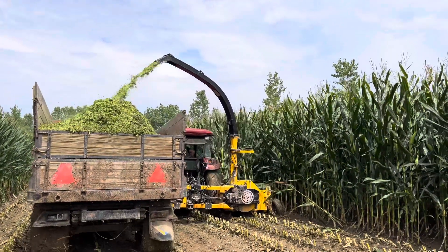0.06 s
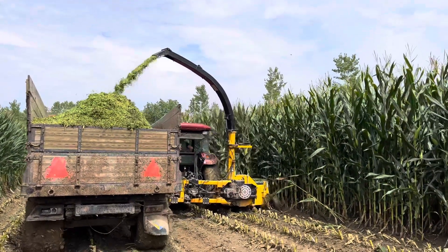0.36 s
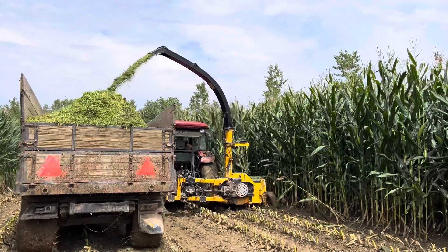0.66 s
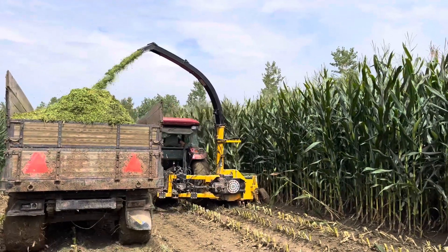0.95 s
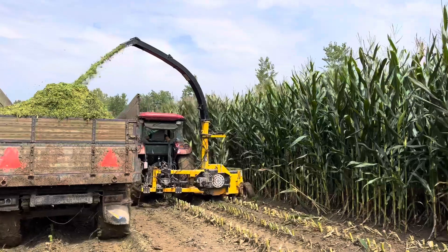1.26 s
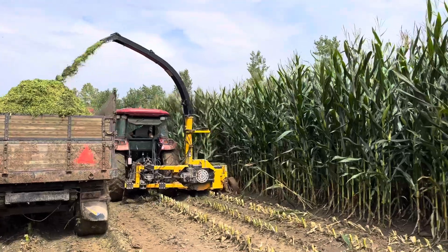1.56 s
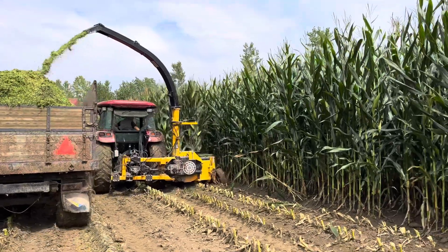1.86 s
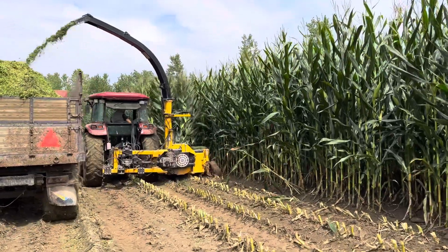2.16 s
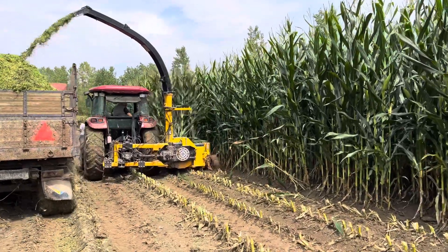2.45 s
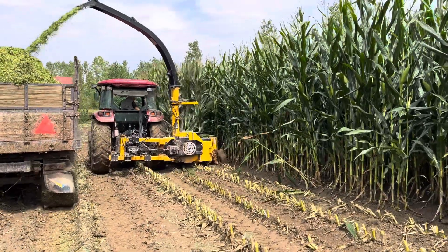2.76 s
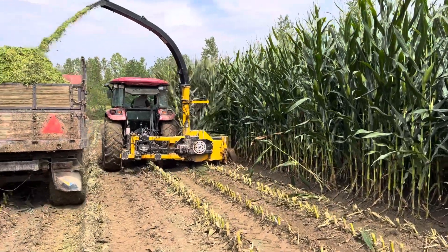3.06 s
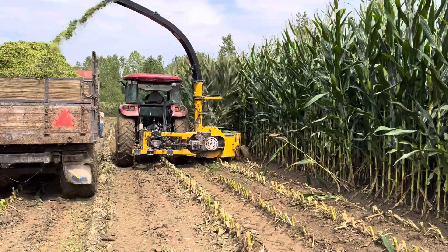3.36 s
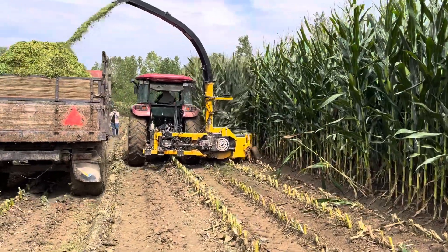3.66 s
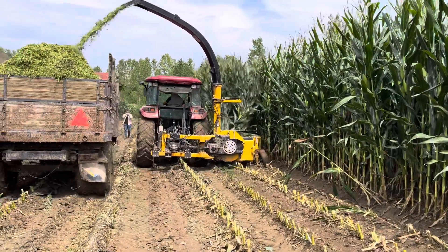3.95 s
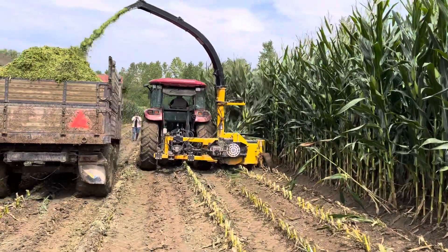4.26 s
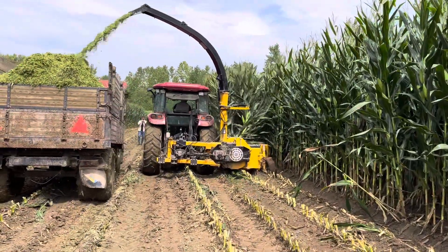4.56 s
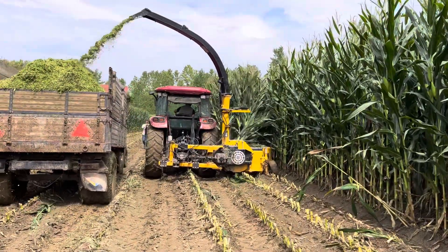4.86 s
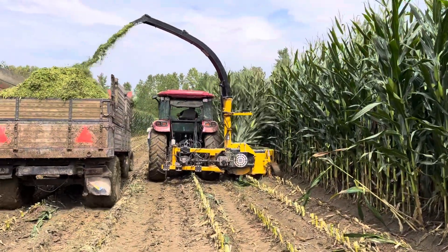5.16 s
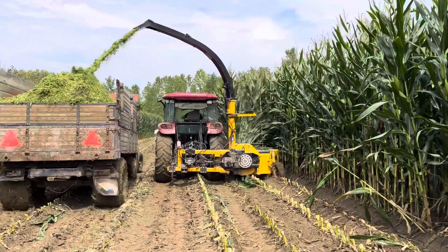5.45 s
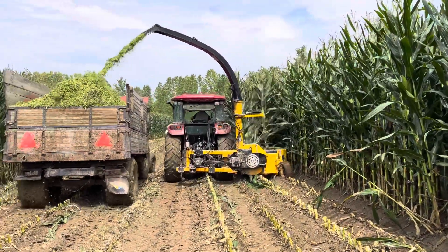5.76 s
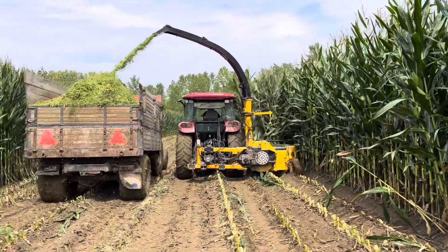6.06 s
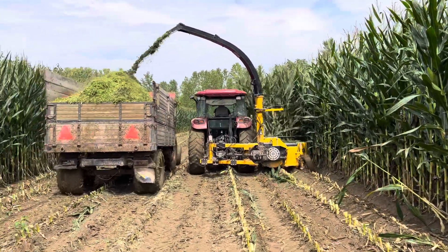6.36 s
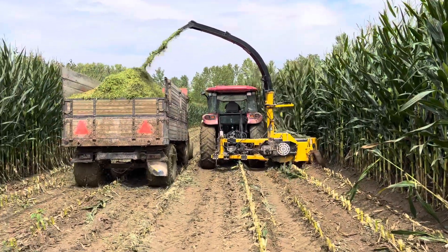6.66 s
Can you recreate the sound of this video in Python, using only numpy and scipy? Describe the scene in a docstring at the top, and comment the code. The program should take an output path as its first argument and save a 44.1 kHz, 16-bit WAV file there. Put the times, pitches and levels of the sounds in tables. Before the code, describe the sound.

A crop chopper hums loudly at nearly one pitch over a droning tractor, shredded stalks hissing up its spout as a truck rumbles nearby.

```python
"""An open field of tall maize, behind a tractor-driven forage harvester, on two closely spaced mic ports.
At first a small diesel truck screens the machine: the twelve-knife chopper hums and throbs with the feed,
the tractor drones below it, the housing roars and chopped stalks hiss up the steel spout.
From about two seconds the truck revs up and clears the line of sight, and a bright band of the roar climbs.
After five seconds the harvester pulls away and its roar eases; near the end the truck's revs drop."""
import sys
import numpy as np
from scipy import signal
from scipy.fft import rfft, irfft, next_fast_len
from scipy.io import wavfile
from scipy.ndimage import uniform_filter1d, map_coordinates

SR = 44100
rng = np.random.default_rng(int(sys.argv[2]) if len(sys.argv) > 2 else 0)


def put_to_file(sound):
    """Save the sound as 16-bit audio at rate SR, in the file named by the first command-line argument."""
    columns = np.atleast_2d(sound).T  # one column per channel
    safe = np.clip(columns, -1, 1)
    whole_steps = np.round(safe * 32767)
    wavfile.write(sys.argv[1], SR, whole_steps.astype(np.int16))


N = 300321

# How far the truck has cleared the mic's view. Each row: time in seconds, share from 0 to 1.
VIEW = [(0, 0), (1.5, 0.07), (2.4, 0.25), (3.3, 0.81), (6.81, 0.99)]
# The two mic ports. Each row: frequency in Hz, left over right in dB, left lead in radians, likeness 0-1.
MIC_PORTS = [(60, -2.5, -.47, 1), (160, -2.7, -.52, 1), (225, -4.2, -.5, 1), (310, -6.2, -.35, .995),
             (450, -8, .45, .9), (600, -11.5, 1.2, .8), (800, -3, 1.8, .94), (1050, 2.5, 1.5, .85),
             (1200, 2.5, .7, .9), (1350, 1.3, .3, .9), (1520, .7, .3, .8), (1720, 0, 0, .3),
             (2000, -.7, -.5, .75), (2700, -.5, 1.2, .3), (3300, -2.5, .45, .55), (4200, -3, .4, .65),
             (5300, -4.5, 2.7, .6), (6300, -1.5, 5.7, .6), (7000, 2, 4.2, .4), (7600, 0, 3.2, .98),
             (8600, 0, 3.05, .98), (9100, -1, 2.2, .5), (10000, -2, 1.3, .55), (10700, 0, .1, .96),
             (12400, 0, -.2, .96), (13400, 0, -1.1, .85), (14100, 0, -2.5, .8)]
# Wide stereo part of the roar, screened and in view. Each row: frequency in Hz, relative level in dB.
WIDE_ROAR_SCREENED = [(400, -27), (600, -6), (820, -1), (960, -14), (1250, -0.5), (1680, -5), (1950, -9),
                      (2130, -8), (2600, -19), (3050, -10), (3300, -17), (3500, -4), (4200, -51)]
WIDE_ROAR_IN_VIEW = [(750, -25), (1040, 3.5), (1300, -22), (1600, -0.5), (1760, -3.5), (2150, -19),
                     (2500, -13), (2750, -14), (2970, -13), (3500, -50)]
# The truck's slow diesel. Each row: time in seconds, firing rate in Hz, level in dB.
TRUCK_REVS = [(0, 19.3, -32.5), (1.8, 19.5, -35), (2.2, 19.5, -30), (2.6, 22.3, -28.5), (3.1, 25, -27.5),
              (4.45, 23.5, -35.5), (5.05, 26, -31.5), (5.5, 31, -42), (6.25, 29, -45), (6.5, 17, -41),
              (6.81, 18, -44)]
# The truck's silencer. Each row: resonance in Hz, width in Hz, relative gain in dB.
SILENCER_MODES = [(68.5, 27, 6), (148, 67, 4), (260, 110, -6)]
# The tractor's diesel. Each row: multiple of the firing rate, level in dB.
TRACTOR_ORDERS = [(1, -39), (2, -48.5), (3, -48.5), (4, -48)]

# The housing's rumble, and its roar screened and in view. Each row: frequency in Hz, relative level in dB.
RUMBLE_SPECTRUM = [(20, -27), (32, -26), (50, -15), (80, -6.5), (130, 5.5), (160, 0.5), (200, -3.5),
                   (245, 0), (290, 6.5), (345, -3), (410, -13.5), (520, -40), (900, -62)]
ROAR_SCREENED = [(250, -12.5), (400, 1.5), (520, 1.5), (620, 4.5), (720, -4.5), (850, -8.5), (980, -4),
                 (1220, -10.5), (1470, -7.5), (1700, -12), (2400, -11), (2800, -16), (3500, -38),
                 (6000, -62)]
ROAR_IN_VIEW = [(250, -30), (400, -2), (510, -2), (600, 2.5), (690, 0.5), (780, 7.5), (900, -5.5),
                (1060, -13.5), (1450, -17), (1720, -12), (2250, -22), (2700, -13), (3500, -20), (6000, -59)]
# Side panels, heard past the truck. Each row: resonance in Hz, width in Hz, relative gain in dB.
PANEL_MODES = [(1000, 48, 2.5), (1128, 70, -2), (1469, 70, 1.5), (1842, 70, -4), (2024, 43, -1.5)]
# A band of roar that climbs as the mic moves. Each row: time in seconds, pitch in Hz, base level in dB.
BRIGHT_CLIMB = [(0, 990, -52), (1.751, 1020, -48), (2.2, 1060, -36), (2.7, 1200, -40), (3.2, 1285, -34.5),
                (3.6, 1405, -37), (3.9, 1370, -34), (4.0, 1350, -31.5), (4.12, 1394, -33.5),
                (4.85, 1400, -36), (5.2, 1427, -35), (5.6, 1440, -35.5), (6.81, 1470, -34)]
# Brief booms of the housing. Each row: time in seconds, rise in dB.
HOUSING_BOOMS = [(0.1, 1), (0.36, 1.5), (0.75, 2), (0.93, 0.5), (1.76, 2.5), (1.81, 1.5), (2.98, 3),
                 (4.52, 1.5), (4.79, 2), (6.15, 1.5)]

# Bunches of stalks hit the knives. Each row: time in seconds, rise of hiss in dB, of drum ring in dB.
STALK_BUNCHES = [(0.12, 3.5, 7), (0.34, 4, 6), (0.69, 3.5, -6), (0.86, 2.5, 1), (0.95, 1.5, -7),
                 (1.04, 3, -4), (2.15, 3, -2), (2.68, 5.5, 4), (2.86, 4, 0), (3.22, 5, -3), (3.44, 2.5, 8),
                 (3.75, 6, 10), (3.89, 4, 4), (3.99, 4, 8), (4.12, 4, 5.5), (4.28, 4, 11), (4.5, 4.5, 8),
                 (4.69, 4, 8), (4.77, 3.5, 6), (4.99, 6, 8), (5.33, 1.5, 5), (6.28, 2.5, 7)]
# Steady crop flow between bunches. Each row: time in seconds, hiss level in dB, spray level in dB.
CROP_FLOW = [(0, -41, -46.5), (1.0, -41.5, -47.5), (1.9, -42, -44), (3.3, -42, -45.5), (4.0, -44, -46),
             (4.6, -42.5, -47), (5.6, -43.5, -48), (6.3, -43.5, -48), (6.81, -47, -47)]
# Hiss and fine spray of the chips. Each row: frequency in Hz, relative level in dB.
HISS_SPECTRUM = [(1200, -38), (2400, -3.5), (2900, -7), (3300, -2), (3800, -0.5), (4400, -3.5), (5300, -7),
                 (6300, -10.5), (7500, -17.5), (10000, -22), (15000, -21)]
SPRAY_SPECTRUM = [(4000, -2.5), (7500, -7.5), (9500, -1.5), (11500, -6), (13500, -9.5), (15000, -11)]
# The steel spout and the knife drum. Each row: resonance in Hz, width in Hz, relative gain in dB.
SPOUT_MODES = [(3295, 130, 7), (3450, 170, 4.5), (3800, 240, -0.5), (4207, 110, 6)]
DRUM_MODES = [(1965, 210, 1.5), (2150, 260, -9.5), (2516, 190, -11.5)]
# The spout's ring as it swings. Each row: time in seconds, level against the steady hiss in dB.
SPOUT_LEVEL = [(0, -6.5), (1.3, -4.5), (1.7, -13.5), (2.9, -12.5), (3.6, -5), (4.5, -5.5), (5.2, -3),
               (6.1, -1.5), (6.81, -1.5)]

# The chopper's speed. Each row: time in seconds, knife passes per second.
KNIFE_RATE = [(0, 155.9), (0.5, 157.4), (0.82, 154.2), (1.1, 154.7), (1.5, 157.9), (1.76, 162.4),
              (2.1, 161.8), (2.3, 160.8), (2.87, 160.3), (3.1, 157.5), (3.43, 157.4), (3.75, 157.6),
              (4.2, 155.7), (4.45, 152.9), (4.9, 154.7), (5.1, 153.1), (5.5, 154.7), (6.2, 154.8),
              (6.38, 152.6), (6.6, 157.7), (6.81, 158.8)]
# Higher knife harmonics. Each row: multiple of the knife rate, base level in dB screened, then in view.
BUZZ_ORDERS = [(4, -37.5, -40.5), (6, -43, -48), (7, -46.5, -52), (8, -51.5, -53.5), (9, -53, -56.5),
               (10, -72.5, -50.5), (13, -54, -65)]
# How hard the knives bite. Each row: time in seconds, rise of those harmonics in dB.
KNIFE_STRAIN = [(0, -2.5), (1.4, -1), (1.85, 1), (2.2, 0), (2.6, -3), (3.7, -1.5), (4.5, -4), (5.5, -1.5),
                (6.81, -4)]
# The third knife harmonic and the whining fifth. Each row: time in seconds, base level in dB.
THIRD_LEVEL = [(0, -37), (0.36, -34.5), (0.6, -40), (0.9, -34), (1.55, -38), (1.78, -31), (1.98, -37),
               (2.4, -36), (2.7, -44.5), (3.0, -35), (3.7, -46.5), (4.3, -41.5), (4.6, -39), (5.5, -39),
               (5.9, -40.5), (6.2, -38), (6.5, -50.5), (6.81, -46)]
WHINE_LEVEL = [(0, -43), (1.45, -43), (1.8, -41.5), (2.08, -35), (2.42, -46), (2.7, -37.5), (3.15, -42),
               (3.55, -34), (3.92, -35), (4.4, -42.5), (4.8, -37.5), (5.3, -41.5), (5.9, -47.5),
               (6.81, -42)]
# Lines from unequal knives. Each row: multiple of the rotor speed, level in dB screened, then in view.
ROTOR_LINES = [(8, -38, -42), (10, -34, -46.5), (16, -44.5, -39.5), (19, -40.5, -45), (21, -57, -50),
               (22, -45.5, -41), (28, -37, -41.5), (34, -49, -48)]
# The strongest rotor line. Each row: time in seconds, level in dB.
DRONE_LEVEL = [(0, -37.5), (0.3, -31), (0.7, -39), (1.3, -39.5), (1.6, -31), (2.0, -33), (2.35, -31),
               (2.9, -31), (3.55, -37.5), (4.15, -27.5), (4.45, -35.5), (4.8, -29.5), (5.05, -25.5),
               (5.45, -41), (5.75, -27), (6.3, -39), (6.6, -30.5), (6.81, -34)]
# The hum's throb. Each row: multiple of the rotor speed, depth in dB.
ROTOR_THROB = [(1, 1), (2, 0.48), (3, 0.3)]
# The hum, weak while the truck's tail crosses the view. Each row: time in seconds, base level in dB.
HUM_LEVEL = [(0, -18), (0.7, -17.5), (1.5, -18), (1.75, -23.5), (2.05, -19), (2.35, -22), (2.55, -16.5),
             (2.8, -15), (3.3, -18), (3.75, -13.5), (4.3, -18), (5.6, -18.5), (6.3, -19), (6.81, -22.5)]
# Surges of the hum. Each row: time in seconds, rise of the hum in dB, rise of its octave in dB.
HUM_SURGES = [(0.36, 3, 5.5), (0.7, -2.5, 5), (1.2, -1, 7), (1.38, 1.5, 5.5), (2.68, -0.5, 4.5),
              (2.96, 0, 3.5), (3.03, -0.5, 3.5), (3.46, 3.5, 6.5), (4.05, 1, 3), (4.45, 0, 5),
              (4.66, 1.5, 5), (4.95, 1, 4), (5.08, 0.5, 3.5), (5.31, -0.5, 3.5), (5.6, 2.5, 4),
              (5.85, 2.5, 4), (6.41, 6, 7)]
# Brief dips of the hum and, at other moments, its octave. Each row: time in seconds, depth in dB.
HUM_DIPS = [(1.68, 15.5), (1.87, 20), (2.34, 5), (3.35, 4.5)]
OCTAVE_DIPS = [(0.54, 7.5), (1.05, 16.5), (3.1, 8.5), (3.6, 15), (4.17, 12), (5.42, 5.5), (6.26, 13),
               (6.56, 3)]

KNIVES, FIRINGS_PER_KNIFE, DRONE_ORDER = 12, 0.4145, 17
DRAW_IN_S, BLOW_OUT_S = 0.026, 0.044  # rise and fall of a bunch
BOOM_S, SURGE_S, DIP_S = 0.027, 0.035, 0.035  # half-lengths
ROAR_FEED, RUMBLE_FEED, SPRAY_FEED, SPOUT_FEED = 0.32, 0.23, 0.27, 0.94  # shares of the hiss's rise
RECEDE_FROM_S, RECEDE_DB_PER_S, SPOUT_DRIFT_PER_S = 5.05, 1, 0.009
TOP_HZ = 14300


def amp(db):
    """Decibels to gain."""
    return 10 ** (np.asarray(db) / 20)


def unit(x):
    """Scale to rms 1."""
    return x / np.sqrt(np.mean(x ** 2) + 1e-20)


def along(points, hz):
    """Each column after the frequency, read on a log axis."""
    f, *cols = np.transpose(points)
    return [np.interp(np.log(hz + 1), np.log(f + 1), c) for c in cols]


def curves(rows):
    """One value per sample for each column after the time."""
    s, *cols = np.transpose(rows)
    return [np.interp(np.arange(N) / SR, s, c) for c in cols]


def swells(rows, rise_s, fall_s):
    """A curve for each dB column, with one smooth hump for each row."""
    t = np.arange(N) / SR
    hump = lambda s: np.exp(-.5 * ((t - s) / np.where(t < s, rise_s, fall_s)) ** 2)
    return np.squeeze(sum(np.outer(db, hump(s)) for s, *db in rows))


def wobble(rate):
    """A smooth random curve, rate knots a second."""
    steps = np.linspace(0, N, num=4096)
    knots = rng.standard_normal(size=2048)
    return np.interp(np.arange(N), steps, map_coordinates(knots, [steps * rate / SR], mode="wrap"))


def filtered(x, response):
    """x times a complex response of frequency."""
    m = next_fast_len(N + SR // 4)
    return irfft(rfft(x, m) * response(np.fft.rfftfreq(m, 1 / SR)), m)[..., :N]


def coloured(x, spectrum):
    """x given a spectrum, at rms 1."""
    return unit(filtered(x, lambda hz: amp(along(spectrum, hz)[0])))


def ringing(hz, modes):
    """Response of steep-sided resonances."""
    return sum(amp(db) * (1j * hz * width / (centre ** 2 - hz ** 2 + 1j * hz * width)) ** 2
               for centre, width, db in modes)


def resonate(x, modes):
    """x through steady resonances, at rms 1."""
    return unit(filtered(x, lambda hz: ringing(hz, modes)))


def puffs(turns, depth):
    """Two noises, direct and scattered, that swell once a cycle."""
    return rng.standard_normal((2, N)) * np.exp(depth * np.cos(2 * np.pi * turns))


def patchy(x, depth_db):
    """Each band swells and fades on its own."""
    z = signal.stft(x, nperseg=1024)[2]
    field = rng.standard_normal(z.shape[1:])
    field = uniform_filter1d(uniform_filter1d(field, size=3, axis=0), size=12, axis=1)
    return signal.istft(z * amp(depth_db * unit(field)), nperseg=1024)[1][:, :N]


def partial(turns, rough, rate):
    """A line of rms 1 whose strength and phase flutter."""
    angle = 2 * np.pi * turns
    return unit((1 + rough * wobble(rate)) * np.cos(angle) + rough * wobble(rate) * np.sin(angle))


def in_view():
    """How much of the harvester the mic sees past the truck, 0-1."""
    return np.clip(curves(VIEW)[0], 0, 1)


def distance_db():
    """Loss of level as the machine pulls away; the layers that follow it scale it."""
    return -RECEDE_DB_PER_S * np.maximum(np.arange(N) / SR - RECEDE_FROM_S, 0)


def orders(turns, table, rough, rate):
    """Lines at whole multiples of a cycle; a second level, if given, holds in full view."""
    clear = in_view()
    return sum(amp(db[0] + (db[-1] - db[0]) * clear) * partial(k * turns + rng.random(), rough, rate)
               for k, *db in table)


def wide_roar(passes, feed_db):
    """The wide stereo part of the roar, opposite in left and right."""
    clear = in_view()
    screened_noise, open_noise = puffs(passes, depth=0.1)
    screened = amp(-39) * np.sqrt(1 - clear) * coloured(screened_noise, WIDE_ROAR_SCREENED)
    uncovered = amp(-40.5) * np.sqrt(clear) * coloured(open_noise, WIDE_ROAR_IN_VIEW)
    return np.outer([1, -1], (screened + uncovered) * amp(ROAR_FEED * feed_db + distance_db()))


def tractor(firings):
    """Up ahead, the loaded engine drones on multiples of its firing rate."""
    return orders(firings, TRACTOR_ORDERS, rough=0.24, rate=9)


def truck():
    """Beside the harvester: one thump per firing through the silencer, harder as it gathers speed."""
    rate_hz, effort_db = curves(TRUCK_REVS)
    thumps = np.diff(np.floor(np.cumsum(rate_hz) / SR), prepend=0)
    return amp(effort_db) * resonate(thumps * amp(1.4 * wobble(40)), SILENCER_MODES)


def bright_band(x, width, lower_width):
    """Three steep resonances glide together as the mic moves; widths are shares of the middle pitch."""
    hz, t, z = signal.stft(x, SR, nperseg=1024)
    s, pitch_hz, _ = np.transpose(BRIGHT_CLIMB)
    ratio = hz[:, None] / np.interp(t, s, pitch_hz)
    lobe = lambda centre, width: 1 / (1 + np.abs((ratio - centre) / width) ** 3)
    clear = np.interp(t * SR, np.arange(N), in_view())
    upper = amp(-8) * lobe(1.503, width)
    lower = amp(1.5) * lobe(0.614, lower_width)
    gain = lobe(0.99, width) + clear * (upper + lower)
    return unit(signal.istft(z * gain, nperseg=1024)[1][:, :N]) * amp(curves(BRIGHT_CLIMB)[1] + 0.7)


def housing(passes, firings, buzz, feed_db, boom_db):
    """Air churned by the knives and diesel clatter fill the sheet-steel body."""
    clear = in_view()
    rumble_db = -31.6 + 5.0 * clear + RUMBLE_FEED * feed_db + distance_db() + 1.5 * wobble(8.9)
    roar_db = ROAR_FEED * feed_db + boom_db + 1.1 * distance_db() + .5 * wobble(7.2)
    rumble = amp(rumble_db) * coloured(puffs(passes / KNIVES, depth=0.13), RUMBLE_SPECTRUM)
    churn = lambda depth: patchy(puffs(passes, depth), depth_db=2.5)
    screened = amp(-30.5) * np.sqrt(1 - clear) * coloured(churn(depth=0.05), ROAR_SCREENED)
    uncovered = amp(-33.0) * np.sqrt(clear) * coloured(churn(depth=0.064), ROAR_IN_VIEW)
    panels = amp(-44.5) * (1 - clear) ** 3 * resonate(puffs(passes / KNIVES, depth=0.18), PANEL_MODES)
    # The bright band also lifts whichever knife harmonic lies inside it.
    direct_buzz = np.outer([1, 0], amp(28.5) * filtered(buzz, lambda hz: hz > 1000))
    clatter = bright_band(puffs(firings, depth=0.059) + direct_buzz, width=0.13, lower_width=0.049)
    return rumble + amp(roar_db) * (screened + uncovered + panels) + clatter


def spout_ring(x):
    """The spout's resonances stand out or fade as it swings, and drift up as the machine pulls away."""
    hz, t, z = signal.stft(x, SR, nperseg=2048)
    drift = 1 + SPOUT_DRIFT_PER_S * np.maximum(t - RECEDE_FROM_S, 0)
    gain = np.abs(ringing(hz[:, None] / drift, SPOUT_MODES))
    return unit(signal.istft(z * gain, nperseg=2048)[1][:, :N]) * amp(curves(SPOUT_LEVEL)[0])


def crop(passes, feed_db, ring_db):
    """Stalks are cut at each knife pass; the chips ring the drum and patter up the spout."""
    patter = amp(0.73 * wobble(260) + 0.84 * wobble(30))
    flow_db, spray_db = curves(CROP_FLOW)
    chips = patter * patchy(puffs(passes, depth=0.036), depth_db=2.3)
    hiss = amp(flow_db + feed_db) * coloured(chips, HISS_SPECTRUM)
    spout = amp(flow_db + SPOUT_FEED * feed_db) * spout_ring(puffs(passes, depth=0.16))
    drum_db = -48.5 + 2.0 * in_view() + ring_db + 5.2 * distance_db()
    drum = amp(drum_db) * resonate(puffs(passes, depth=0.2), DRUM_MODES)
    fine_chips = patter * puffs(passes, depth=0.065)
    spray = amp(spray_db + SPRAY_FEED * feed_db) * coloured(fine_chips, SPRAY_SPECTRUM)
    return hiss + spout + drum + spray


def knife_buzz(passes):
    """Each sharp cut gives higher harmonics; they chug twice a turn, and the uneven crop smears them."""
    clear = in_view()
    lines = sum(amp(screened_db + (open_db - screened_db) * clear)
                * partial(k * passes, rough=1.0, rate=8.5 * k) for k, screened_db, open_db in BUZZ_ORDERS)
    lines *= amp(curves(KNIFE_STRAIN)[0] + 1.9 * distance_db())
    third = amp(curves(THIRD_LEVEL)[0]) * partial(3 * passes, rough=0.8, rate=32)
    whine = amp(curves(WHINE_LEVEL)[0]) * partial(5 * passes, rough=0.69, rate=24)
    chug_db = 1.2 * np.cos(4 * np.pi * passes / KNIVES) + 1.7 * wobble(24)
    return (lines + third + whine) * amp(chug_db)


def throb(passes):
    """Swing of level that repeats with every turn of the rotor, in dB."""
    return sum(db * np.cos(2 * np.pi * (k * passes / KNIVES + rng.random())) for k, db in ROTOR_THROB)


def chopper(passes):
    """Each knife pushes a pulse of air; unequal knives make the hum throb and add rotor lines."""
    base_db = curves(HUM_LEVEL)[0]
    surge_db, octave_surge_db = swells(HUM_SURGES, SURGE_S, SURGE_S)
    hum_db = base_db + surge_db - swells(HUM_DIPS, DIP_S, DIP_S)
    hum_db += throb(passes) + 0.5 * wobble(14)
    # The octave partly follows the hum, opens up in full view and throbs deeper.
    octave_db = -28.5 + 6 * in_view() + 0.67 * (base_db - base_db.mean())
    octave_db += octave_surge_db - swells(OCTAVE_DIPS, DIP_S, DIP_S)
    octave_db += 1.74 * throb(passes) + 1.24 * wobble(14)
    hum = amp(hum_db) * partial(passes, rough=0.14, rate=30)
    octave = amp(octave_db) * partial(2 * passes, rough=0.23, rate=30)
    drone = amp(curves(DRONE_LEVEL)[0]) * partial(DRONE_ORDER * passes / KNIVES, rough=0.23, rate=9)
    return hum + octave + drone + orders(passes / KNIVES, ROTOR_LINES, rough=0.76, rate=7)


def microphone(direct, scattered):
    """The two ports differ in level and phase; scattered sound reaches them in opposition."""
    def response(hz):
        tilt_db, lead, alike = along(MIC_PORTS, hz)
        spread = np.arccos(np.clip(alike, 0, 1)) / 2
        gains = amp([tilt_db / 2, -tilt_db / 2])
        gains /= np.sqrt(np.mean(gains ** 2, axis=0))
        left, right = gains * np.exp([1j * lead / 2, -1j * lead / 2])
        return np.array([[left * np.cos(spread), left * np.sin(spread)],
                         [right * np.cos(spread), -right * np.sin(spread)]])
    return filtered(np.array([direct, scattered]), response).sum(axis=1)


def scene():
    """Tractor and chopper turn together through the drive shaft; the truck keeps its own pace."""
    passes = np.cumsum(curves(KNIFE_RATE)[0]) / SR
    firings = FIRINGS_PER_KNIFE * passes
    feed_db, ring_db = swells(STALK_BUNCHES, DRAW_IN_S, BLOW_OUT_S)
    boom_db = swells(HOUSING_BOOMS, BOOM_S, BOOM_S)
    buzz = knife_buzz(passes)
    direct, scattered = housing(passes, firings, buzz, feed_db, boom_db) + crop(passes, feed_db, ring_db)
    tones = chopper(passes) + amp(boom_db) * buzz + tractor(firings) + truck()
    return microphone(direct + tones, scattered) + wide_roar(passes, feed_db)


def record(dry):
    """Nothing is kept above the band limit."""
    return filtered(dry, lambda hz: hz < TOP_HZ)


dry = scene()
out = record(dry)
put_to_file(out)
```